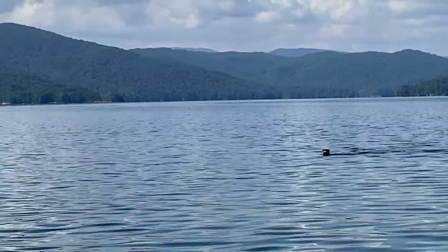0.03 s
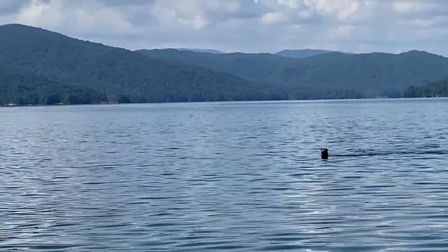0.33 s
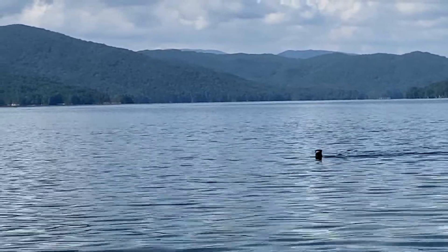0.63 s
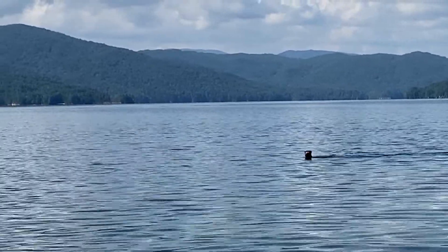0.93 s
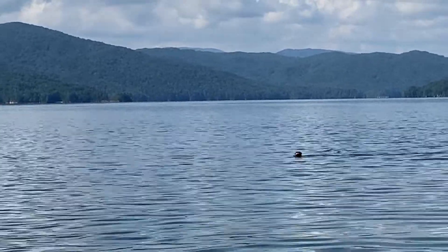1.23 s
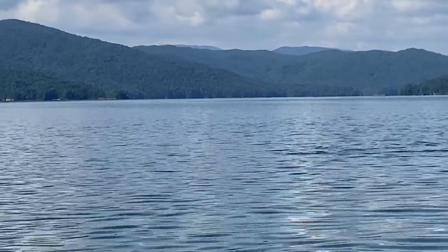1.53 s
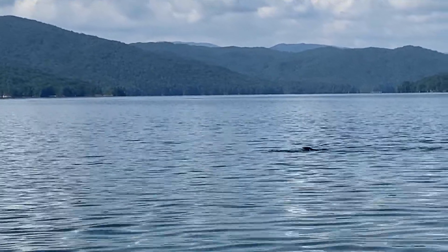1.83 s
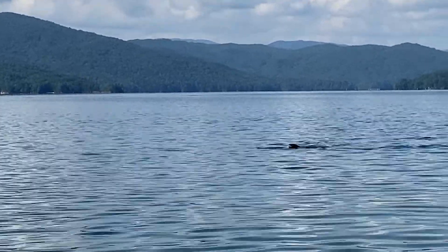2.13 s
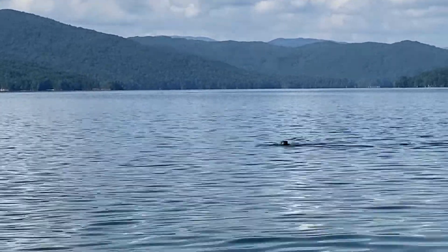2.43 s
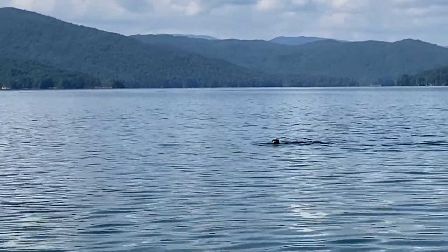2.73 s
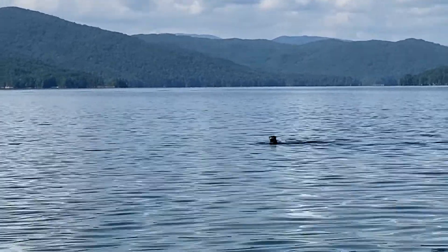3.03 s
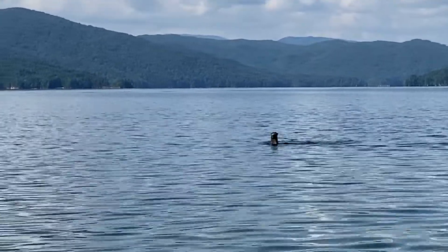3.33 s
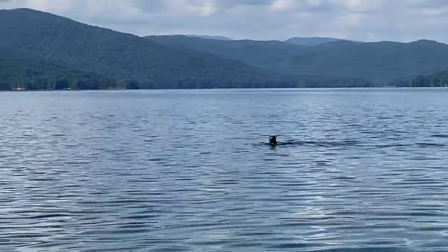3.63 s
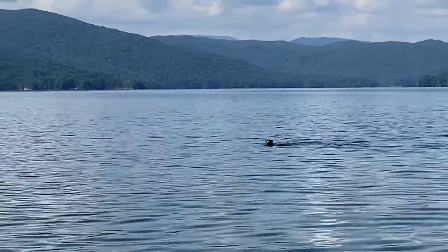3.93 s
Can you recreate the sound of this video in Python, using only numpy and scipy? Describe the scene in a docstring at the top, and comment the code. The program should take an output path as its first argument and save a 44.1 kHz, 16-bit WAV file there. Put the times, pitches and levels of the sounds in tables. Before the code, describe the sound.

A swimming otter gives one short, high squeak about a third of the way in. Close by, lake ripples plop against a hull with drips and small splashes, over low wind and a distant motor hum.

```python
"""Ripples slap a floating hull with hollow plops, over a low wind rumble and the hum of a far motor.
Small splashes, drips and trickles sound close by, their trapped air bubbles ringing as damped resonators.
About a third of the way in, an otter swimming in the lake gives one short, arched squeak,
a nearly pure harmonic tone that the open water scatters back faintly."""
import sys
import numpy as np
from scipy import signal
from scipy.fft import rfft, irfft
from scipy.io import wavfile
from scipy.ndimage import uniform_filter1d

SR = 44100
rng = np.random.default_rng(int(sys.argv[2]) if len(sys.argv) > 2 else 0)


def master_out(mix):
    """Clip the mix to full scale and print it as 16-bit PCM to the path in sys.argv[1]."""
    frames = np.transpose(np.atleast_2d(mix))
    ceiling = np.clip(frames, -1, 1)
    pcm = np.round(ceiling * 32767).astype(np.int16)
    wavfile.write(sys.argv[1], SR, pcm)


N = 176400


def otter_squeak():
    """A harmonic source whose overtones grow with effort; scattering off the lake adds a faint tail."""
    # Each row: time in seconds, pitch in Hz, level in dB.
    contour = [(1.3527, 3560, -55), (1.3545, 3570, -33.5), (1.362, 3623, -28), (1.373, 3703, -23.5),
               (1.38, 3620, -25), (1.386, 3470, -29), (1.391, 3280, -29), (1.397, 3120, -41.5),
               (1.399, 3030, -57)]
    # Each row: harmonic number, level in dB at full effort.
    overtones = [(2, -11), (3, -20.5), (4, -27)]
    # Each row: delay in seconds, relative level of the scattered sound in dB.
    scatter_decay = [(0, -4), (.025, -7), (.05, -2), (.075, -8), (.11, -7), (.15, -17), (.25, -30),
                     (.5, -29)]
    # Each row: frequency in Hz, gain of the scattered sound in dB.
    scatter_colour = [(3500, 0), (7400, 2.5), (10500, -14)]
    t = np.arange(N) / SR
    times, hz, db = np.transpose(contour)
    jitter = 1 + .0035 * drift(rate_hz=500)
    pitch = uniform_filter1d(np.interp(t, times, hz), size=220) * jitter
    phase = 2 * np.pi * np.cumsum(pitch) / SR
    level = amp(np.interp(t, times, db, left=-200, right=-200))
    brightness = (level / level.max()) ** .64
    tone = np.sin(phase) + brightness * sum(amp(d) * np.sin(k * phase) for k, d in overtones)
    rasp = unit(colour(rng.standard_normal(N), [(1500, -34), (3500, 7.5), (6500, -1), (15000, -14)]))
    roughness = 1 + .016 * drift(rate_hz=1300)
    call = level * (np.sqrt(2) * tone * roughness + amp(-26) * rasp)
    tail = amp(np.interp(t[:SR // 2], *np.transpose(scatter_decay)))
    return call + amp(-24.5) * echo(colour(call, scatter_colour), tail)


def hull_plops():
    """Impact excites resonance: a closing ripple gives a few falling cycles, and the hull rings."""
    # Each row: start in seconds, level in dB, starting pitch in Hz, rise time in seconds.
    plops = [(.2105, -37.5, 1300, .0009), (.4035, -40, 1700, .001), (.47, -35.5, 1800, .0007),
             (.4895, -38, 2600, .0005), (.5117, -32.5, 2200, .0006), (1.5325, -43, 2400, .0006),
             (1.5598, -33, 1350, .0011), (1.588, -41, 1190, .0012), (1.6122, -39.5, 1110, .0009),
             (1.6257, -30, 3000, .0006), (1.6566, -36, 3000, .0009), (1.6738, -38, 3000, .0006),
             (1.69, -35.5, 2700, .0009), (1.7155, -39, 1250, .001), (1.7202, -35, 2500, .0006),
             (1.8487, -38, 2060, .0006), (2.067, -37.5, 1100, .0013), (2.1055, -36.5, 1400, .0012),
             (2.1782, -39, 1700, .0009), (2.2908, -37, 1500, .0008), (2.6447, -34.5, 1700, .001),
             (2.7887, -34, 1100, .0007), (2.8267, -36.5, 1300, .0007), (3.1005, -35, 1300, .0007)]
    # Each row: frequency in Hz, gain of the hollow ring in dB.
    hull = [(300, 9), (550, 1), (1500, -4.5), (3000, -17)]
    end_hz, sag_cycles, hull_t60_s = 510, 1.5, .027
    t, out = np.arange(SR // 20) / SR, np.zeros(N)
    for start, db, hz, rise in plops:
        pitch = end_hz + (hz - end_hz) * np.exp(-t * hz / sag_cycles)
        envelope = (t / rise * np.exp(1 - t / rise)) ** 1.1
        add(out, start, amp(db) * envelope * np.sin(2 * np.pi * np.cumsum(pitch) / SR))
    return out + amp(-5) * colour(echo(out, amp(-60 * t / hull_t60_s)), hull)


def bubble(db, hz, decay, attack_s=.00025, rise_per_s=3.5):
    """Trapped air rings as a damped oscillator, rising in pitch and choked as it surfaces."""
    t = np.arange(SR // 20) / SR
    envelope = (1 - np.exp(-t / attack_s)) * np.exp(-(t / decay) ** 1.6)
    return amp(db) * envelope * np.sin(2 * np.pi * hz * (t + rise_per_s * t ** 2 / 2))


def bubbles(per_s=160, fade_db_per_s=2.5):
    """Bubble resonance: a few clear notes nearby, and many faint ones from ripples that slowly calm."""
    # Each row: start in seconds, level in dB, pitch in Hz, decay time in seconds.
    clear_bubbles = [(.247, -39.5, 1600, 0.0033), (.309, -36, 2860, .003), (.315, -37, 1680, .005),
                     (0.3446, -23, 1350, 0.00095), (.3458, -30, 3300, 0.0026), (0.345, -34, 2220, .003),
                     (.622, -45, 1120, 0.0096), (.867, -41, 1147, 0.014), (1.136, -43.5, 1800, 0.0031),
                     (1.389, -42.5, 2260, 0.0064), (1.6875, -40.5, 2900, .0025),
                     (1.807, -34.5, 2680, 0.0022), (1.8973, -34.5, 1495, 0.01), (2.1269, -30, 2190, 0.0037),
                     (2.383, -43.5, 2040, 0.0061), (2.45, -41.5, 1640, 0.0065),
                     (2.4688, -22.5, 1660, 0.0018), (2.477, -28, 1080, 0.0037), (2.482, -28, 2450, 0.002),
                     (2.4833, -24, 870, 0.0036), (2.4847, -29.5, 1500, .002), (2.492, -42, 1740, .004),
                     (2.584, -38.5, 2500, .003), (2.765, -45, 2930, 0.0019), (3.182, -48, 3230, .003)]
    out = np.zeros(N)
    for start, db, hz, decay in clear_bubbles:
        add(out, start, bubble(db, hz, decay))
    for when, faintness, height in rng.random((int(per_s * N / SR), 3)):
        start, hz = when * N / SR, 700 * 6 ** height
        db = -55 - 4.2 * np.log(max(faintness, .03)) - 5 * height - fade_db_per_s * start
        add(out, start, bubble(db, hz, decay=3.9 / hz))
    return out


def drips(decay_s=.00055):
    """The impact of a drop is a transient: a very short burst of noise around one frequency."""
    # Each row: start in seconds, peak in dB, centre in Hz, half-width in octaves.
    ticks = [(0.2404, -36, 7600, .3), (0.3442, -32.5, 5000, 0.64), (0.4033, -37, 7500, 0.94),
             (.522, -38, 3600, 0.19), (.586, -40, 4500, 0.45), (3.702, -50, 4940, .4),
             (1.748, -43.5, 2880, .4), (1.953, -46, 7060, .27), (2.0567, -37, 3940, 0.46),
             (2.08, -46, 4970, .9), (2.109, -38, 6540, .35), (2.1406, -32, 4500, .7),
             (2.141, -32, 15100, .27), (2.1598, -20, 7400, 0.27), (2.333, -41.5, 4500, .3),
             (2.483, -34, 3800, 0.47), (2.4886, -36.5, 5430, 0.4), (2.5055, -42, 4930, .35),
             (3.408, -43, 5100, 0.26), (3.875, -44.5, 6740, .27)]
    t, out = np.arange(512) / SR, np.zeros(N)
    f = np.fft.rfftfreq(len(t), 1 / SR) + 1
    envelope = (1 - np.exp(-4 * t / decay_s)) * np.exp(-t / decay_s)
    for start, db, hz, octaves in ticks:
        band = 1 / (1 + (np.log2(f / hz) / octaves) ** 2)
        burst = envelope * irfft(rfft(rng.standard_normal(len(t))) * band)
        add(out, start, amp(db) * burst / abs(burst).max())
    return out


def splashes(bubbles_per_s=4000, decay_cycles=2.6):
    """Breaking wavelets excite tiny, heavily damped bubbles at random, over a fine fizz."""
    # Each row: crest, rise and fall in seconds, level in dB, tilt in dB per octave.
    wavelets = [(.23, 0.016, 0.026, -51.5, 1.5), (0.314, 0.018, 0.032, -51.5, -8),
                (.347, 0.006, 0.045, -46, 4.5), (.53, 0.11, 0.13, -58, -3), (1.72, 0.11, 0.19, -62, -7),
                (2.09, 0.019, 0.039, -50.5, 7.5), (2.142, 0.0072, 0.034, -48, 0.5),
                (2.266, 0.019, 0.027, -55, 2), (2.35, 0.017, 0.048, -53, 0),
                (2.483, 0.02, 0.021, -48, -0.5), (2.6, 0.12, 0.042, -60.5, -3)]
    # Each row: frequency in Hz, relative level of the spray in dB.
    spray = [(500, -11.5), (900, 0), (2000, 1.5), (4000, 0), (7500, -12.5), (11000, -19), (16000, -30)]
    t, out = np.arange(SR // 40) / SR, np.zeros(N)
    pitches = np.geomspace(602, 14800, num=24)
    swells = np.array([amp(db) * swell(crest, rise, fall) for crest, rise, fall, db, _ in wavelets])
    tilts = np.array(wavelets)[:, -1]
    for hz in pitches:
        age = t * hz / decay_cycles
        ring = (1 - np.exp(-3 * age)) * np.exp(-age) * np.sin(2 * np.pi * hz * t)
        births = rng.random(N) < bubbles_per_s / len(pitches) / SR
        kicks = births * amp(5 * np.minimum(rng.exponential(1, N), 4))
        fizz = amp(-8) * rng.standard_normal(N)
        drive = unit(kicks - kicks.mean()) + fizz
        level = amp(read(spray, hz) + tilts * np.log2(hz / 3000)) @ swells
        out += level * unit(signal.oaconvolve(drive, ring)[:N])
    return out / np.sqrt(len(pitches))


def trickles(per_s=320, spread_octaves=.16, spread_db=9):
    """Water runs back as a swarm of bubbles; being alike in size, they resonate near one pitch."""
    # Each row: crest in seconds, width in seconds, level in dB, centre in Hz.
    runs = [(.37, 0.022, -58, 2600), (.57, 0.025, -62, 2150), (.92, 0.019, -63.5, 3800),
            (1.73, 0.075, -63, 3050), (2.14, 0.016, -61, 2360), (2.59, 0.023, -59.5, 2580),
            (2.795, 0.017, -63, 2870), (2.97, .07, -64, 2350)]
    out = np.zeros(N)
    for crest, width, db, centre_hz in runs:
        swarm = np.zeros(SR // 2)
        for when, size, height in rng.random((per_s // 2, 3)):
            hz = centre_hz * 2 ** (spread_octaves * (2 * height - 1))
            add(swarm, when / 2, bubble(spread_db * (2 * size - 1), hz, decay=6 / hz))
        out += amp(db) * np.resize(unit(swarm), N) * swell(crest, width, width)
    return out


def hiss():
    """Amplitude modulation shapes high filtered noise into soft puffs."""
    # Each row: crest in seconds, width in seconds, level in dB.
    puffs = [(2.925, 0.016, -60.5), (3.07, 0.035, -55.5), (3.16, 0.094, -69.5), (3.435, 0.0083, -63)]
    # Each row: frequency in Hz, relative level in dB.
    spectrum = [(2000, -30), (4500, -8), (7500, -4), (11000, 1.5), (15000, 1), (16500, -3)]
    envelope = sum(amp(db) * swell(crest, width, width) for crest, width, db in puffs)
    return envelope * unit(colour(rng.standard_normal(N), spectrum))


def wind():
    """Wind and far water make broadband noise, uneven in time and frequency, with gusts in the bass."""
    # Each row: frequency in Hz, relative spectral density in dB.
    spectrum = [(15, -30), (30, -24), (52, -3.5), (76, 1), (105, -5), (160, -13.5), (235, -14),
                (360, -19.5), (430, -26.5), (650, -30), (1000, -35.5), (1600, -38), (3000, -51),
                (4500, -58), (6100, -59), (6700, -58.5), (7300, -62.5), (11000, -62.5), (13000, -64),
                (16000, -80.5)]
    # Each row: time in seconds, gain of the lowest bass in dB.
    gusts = [(0, 1.5), (.6, -1), (1.2, -1.5), (1.7, 0), (2.1, -1), (2.5, -1.5), (2.9, 0), (3.4, 0.5),
             (4, -2)]
    f, t, cells = signal.stft(diffuse_noise(N), SR, nperseg=1024)
    patches = uniform_filter1d(rng.standard_normal(cells.shape[1:]), size=10, axis=0)
    patch_db = 1.5 * unit(uniform_filter1d(patches, size=6, axis=1))
    gust_db = np.interp(t, *np.transpose(gusts)) / (1 + (f[:, None] / 200) ** 2)
    wash = signal.istft(cells * amp(patch_db + gust_db))[1][:, :N]
    return amp(-34) * unit(colour(wash, spectrum))


def motor():
    """The periodic motion of a far motor gives a line spectrum, wavering in level and pitch."""
    # Each row: frequency in Hz, rms level in dB.
    partials = [(126, -47), (189, -52.5), (253.5, -52.5), (379, -58.5), (475, -64.5)]
    out = np.zeros(N)
    for hz, db in partials:
        level = amp(db + 2.5 * drift(rate_hz=1.36))
        pitch = hz * (1 + .00722 * drift(rate_hz=5.78))
        out += np.sqrt(2) * level * np.sin(2 * np.pi * np.cumsum(pitch) / SR)
    return out


def diffuse_noise(n):
    """A diffuse field is partly coherent at two microphones: n samples of stereo noise."""
    # Each row: frequency in Hz, correlation of left and right.
    coherence = [(60, 0.99), (130, 0.84), (290, 0.72), (640, 0.5), (1410, 0.46), (2000, 0.11), (3100, 0.97),
                 (6800, 1), (15000, 1)]
    same = read(coherence, np.fft.rfftfreq(n, 1 / SR))
    left, other = rfft(rng.standard_normal((2, n)))
    return irfft(np.array([left, same * left + np.sqrt(1 - same ** 2) * other]), n)


def echo(x, envelope):
    """Dense reflections act as convolution with an enveloped noise tail of unit energy."""
    tail = diffuse_noise(len(envelope)) * envelope
    return signal.fftconvolve(x[None], tail / np.linalg.norm(tail[0]), axes=1)[:, :N]


def lag_right(x, lags):
    """A later arrival is a phase lag, here of the right channel behind the left."""
    radians = np.array([[0], [1]]) * read(lags, np.fft.rfftfreq(N, 1 / SR))
    return irfft(rfft(x) * np.exp(-1j * radians), N)


def amp(db):
    """Converts decibels to an amplitude ratio."""
    return 10 ** (np.asarray(db) / 20)


def unit(x):
    """Normalises to rms 1."""
    return x / np.sqrt(np.mean(x ** 2) + 1e-20)


def read(points, hz):
    """Interpolates a spectrum on a log-frequency axis."""
    f, value = np.transpose(points)
    return np.interp(np.log(hz + 1), np.log(f + 1), value)


def colour(x, points):
    """Filters with zero phase by a spectrum in dB."""
    n = x.shape[-1]
    return irfft(rfft(x) * amp(read(points, np.fft.rfftfreq(n, 1 / SR))), n)


def add(mix, start, sound):
    """Superposes a sound at a start time in seconds."""
    part = mix[max(round(start * SR), 0):][:len(sound)]
    part += sound[:len(part)]


def drift(rate_hz):
    """Low-pass noise gives a random wandering of rms 1."""
    f = np.fft.rfftfreq(N, 1 / SR)
    return unit(irfft(rfft(rng.standard_normal(N)) * (f > 0) / (1 + (f / rate_hz) ** 4), N))


def swell(crest, rise, fall):
    """A Gaussian envelope with separate rise and fall."""
    t = np.arange(N) / SR - crest
    return np.exp(-.5 * (t / np.where(t < 0, rise, fall)) ** 2)


def scene(near_t60_s=.034):
    """The sources superpose; sound from one side reaches the right microphone later."""
    # Each row: frequency in Hz, extra phase lag on the right in radians.
    side_lag = [(130, 0), (300, .6), (500, 1.4), (800, 1.9), (1400, 2), (2100, 0)]
    water = bubbles() + drips() + splashes() + trickles()
    reflections = amp(-7.5) * echo(water, amp(-60 * np.arange(SR // 8) / SR / near_t60_s))
    centre = otter_squeak() + hull_plops() + reflections + hiss()
    return centre + lag_right(water + wind() + motor(), side_lag)


def record(dry, cutoff_hz=16000):
    """Two band-limited microphone responses, the right lagging and stronger in the midrange."""
    # Each row: frequency in Hz, gain common to both sides in dB.
    response = [(500, -0.5), (3000, -7.5), (6000, -5.5), (7700, -4), (9000, -6.5), (10000, -8.5),
                (15000, -10.5)]
    # Each row: frequency in Hz, excess of right over left in dB.
    balance = [(60, 1.4), (200, 3), (500, -0.5), (800, 0.5), (1350, 10), (2000, 5), (3100, 1.5),
               (15000, -0.5)]
    # Each row: frequency in Hz, phase lag on the right in radians.
    mic_lag = [(100, 0), (800, .35), (2800, .25), (3200, 0), (7100, 0), (9100, 3.1), (10700, 6.2),
               (11700, 6.3), (13200, 9.4), (14500, 12.4)]
    f = np.fft.rfftfreq(N, 1 / SR)
    gain = amp(read(response, f) + np.array([[-.5], [.5]]) * read(balance, f))
    heard = lag_right(irfft(rfft(dry) * gain, N), mic_lag)
    band_limit = signal.firwin(255, cutoff_hz, window=("kaiser", 9), fs=SR)
    return signal.oaconvolve(heard, band_limit[None], "same")


dry = scene()
out = record(dry)
master_out(out)
```